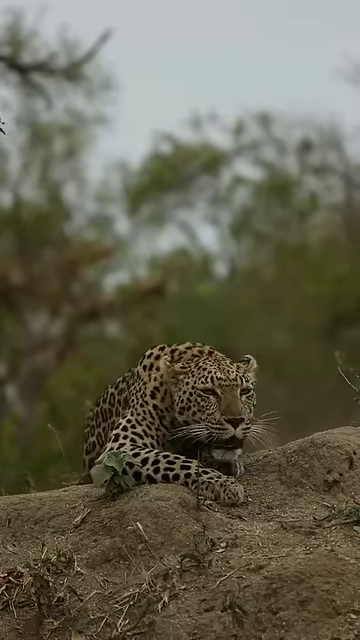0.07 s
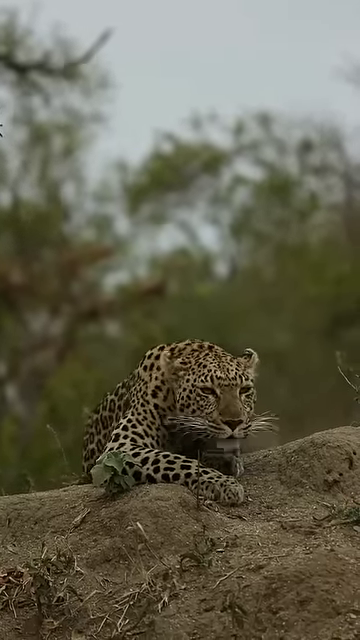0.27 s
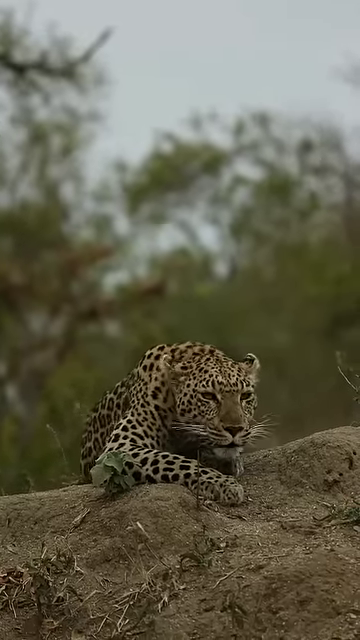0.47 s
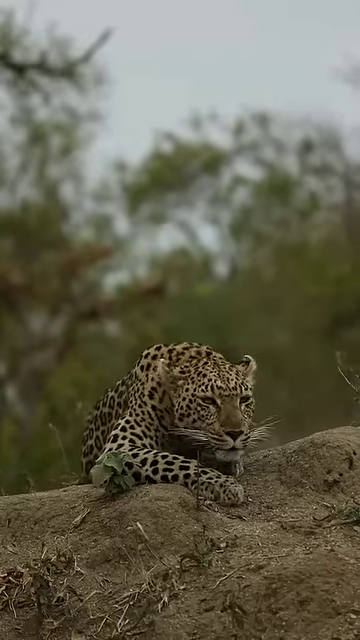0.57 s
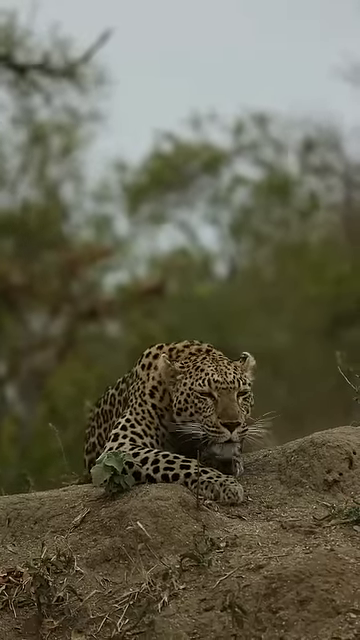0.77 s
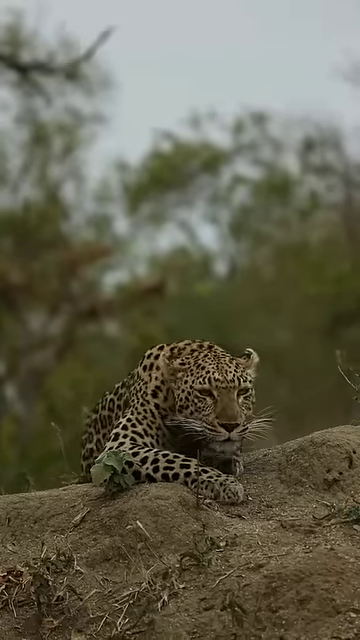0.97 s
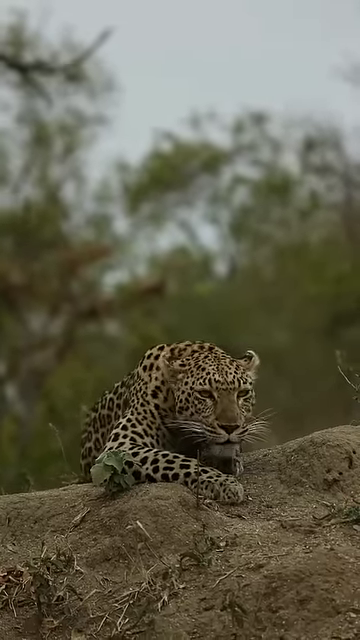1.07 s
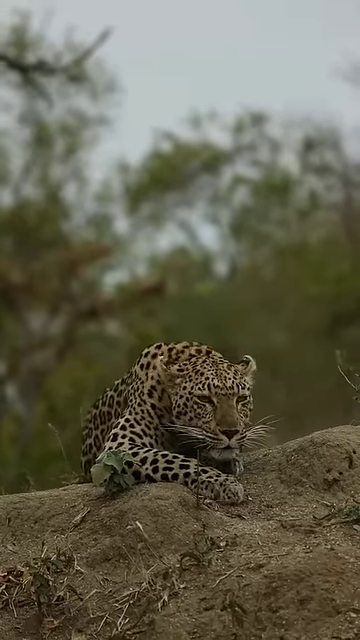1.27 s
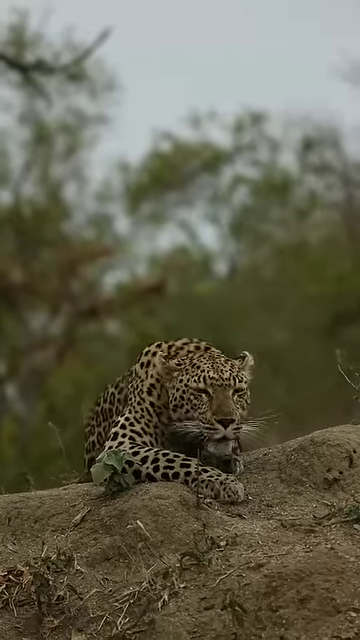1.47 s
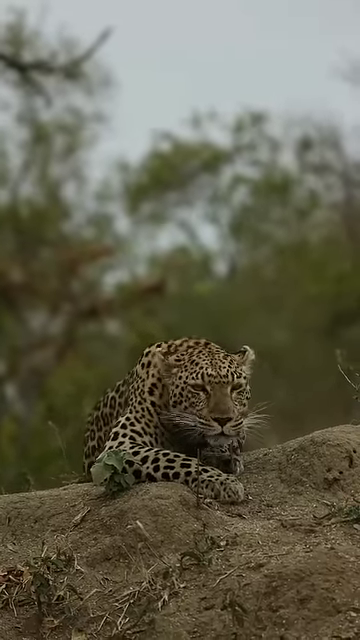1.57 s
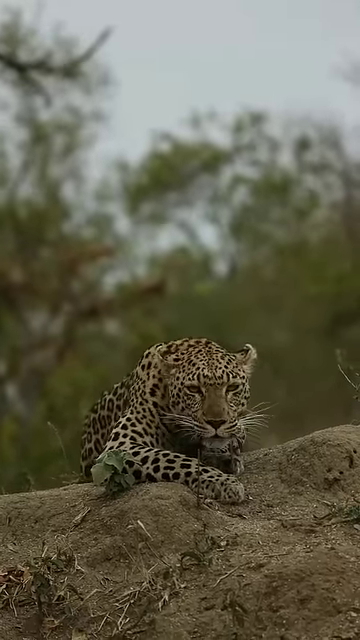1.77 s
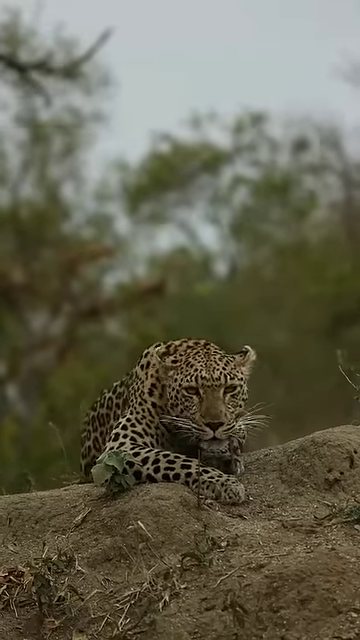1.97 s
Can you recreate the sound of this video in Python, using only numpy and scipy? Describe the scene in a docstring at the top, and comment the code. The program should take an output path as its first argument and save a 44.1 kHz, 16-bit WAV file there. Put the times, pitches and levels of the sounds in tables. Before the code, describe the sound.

A leopard's rasping, sawing call: three deep throaty bursts outdoors, with faint clicks between

```python
"""The bush murmurs faintly throughout as spectrally shaped noise. A leopard saws three times in the open: first
a soft in-stroke grunt, then an out-stroke whose slack vocal folds slap about 50 times a second. Those impulses
ring a deep throat resonance and the higher mouth resonances, under a rasp of air puffs. During the first
out-stroke two dry ticks sound nearby: bursts of decaying noise with a brief sine ring. Late in the second
a camera shutter begins a short burst of three frames, each the same pattern of decaying noise knocks."""
import sys
import numpy as np
from scipy import signal
from scipy.fft import rfft, irfft, next_fast_len
from scipy.io import wavfile
from scipy.ndimage import uniform_filter1d, minimum_filter1d, map_coordinates

SR = 44100
rng = np.random.default_rng(int(sys.argv[2]) if len(sys.argv) > 2 else 0)


def transcribe(u):
    """Save the signal u as a 16-bit wav file named by the first command-line argument.

    u: samples, shape (n,) or (channels, n), limited to [-1, 1]; the rate is SR.
    q: integer samples, one column per channel.
    """
    v = np.clip(np.atleast_2d(u).T, -1, 1)
    q = np.round(v * 32767).astype(np.int16)
    wavfile.write(sys.argv[1], SR, q)


N = 88200
TIME_S = np.arange(N) / SR

# relative spectral weighting of the throat: f/Hz, level/dB
THROAT_SPECTRUM = [(30, -33), (70, 3.5), (130, -2), (220, -1.5), (310, 1), (450, -3), (900, -15.5),
                   (3000, -59)]
# left-right correlation of the breath noise: f/Hz, correlation/1
BREATH_CORRELATION = [(300, .95), (700, 1), (1400, 0.31), (3100, 0.086), (6800, 0.24), (15000, .6)]


def amp(db):
    """Amplitude ratio of a level: twenty decibels are a factor of ten."""
    return 10 ** (np.asarray(db) / 20)


def unit(x):
    """Normalisation to a root-mean-square value of 1."""
    return x / np.sqrt(np.mean(x ** 2) + 1e-20)


def along(points, hz):
    """Linear interpolation of (f/Hz, value) points over logarithmic frequency."""
    f, value = np.transpose(points)
    return np.interp(np.log(hz + 1), np.log(f + 1), value)


def filtered(x, response):
    """Linear filtering: the spectrum is multiplied by a frequency response."""
    size = next_fast_len(N + SR // 2)
    hz = np.fft.rfftfreq(size, 1 / SR)
    return irfft(rfft(x, size) * response(hz), size)[..., :N]


def shaped(x, spectrum):
    """Zero-phase spectral weighting by (f/Hz, level/dB) points."""
    return filtered(x, lambda hz: amp(along(spectrum, hz)))


def noise(spectrum, correlation):
    """Stereo noise of rms 1: the balance of independent mid and side sets the left-right correlation."""
    def mid_and_side(hz):
        angle = np.arccos(np.clip(along(correlation, hz), -1, 1)) / 2
        return amp(along(spectrum, hz)) * np.array([np.cos(angle), np.sin(angle)])

    mid, side = filtered(rng.standard_normal((2, N)), mid_and_side)
    return unit(np.array([mid + side, mid - side]))


def fade(start, t60):
    """Exponential decay after a sudden onset: the level falls 60 dB in t60 seconds."""
    t = TIME_S - start
    return (t >= 0) * amp(-60 * np.abs(t) / t60)


def wobble(rate):
    """Random modulation: a smooth curve through normal deviates at `rate` knots a second."""
    return map_coordinates(rng.standard_normal(2000), [TIME_S * rate], mode="wrap")


def slaps(anchor, rate, jitter, count=40):
    """Quasi-periodic excitation: vocal-fold impulses lose their beat as pressure fades late in the stroke."""
    loose_after_s, loose_growth_per_s = .11, 40
    scatter_db = 3.12  # standard deviation of the slap levels
    chance = rng.standard_normal((count, 2))
    beat = (np.arange(count) - count // 2) / rate
    loose = 1 + loose_growth_per_s * np.maximum(beat - loose_after_s, 0)
    at = np.round((anchor + beat + jitter * loose * chance[:, 0]) * SR).astype(int)
    inside = (at >= 0) & (at < N)
    return np.bincount(at[inside], amp(scatter_db * chance[inside, 1]), N)


def ring(drive, hz, t60, attack, part=np.imag):
    """Damped resonance, which may glide: the drive is shifted to 0 Hz, smeared by the envelope and shifted back."""
    t = np.arange(SR // 5) / SR
    envelope = amp(-60 * t / t60) * (1 - np.exp(-t / attack))
    phasor = np.exp(2j * np.pi * np.cumsum(hz * np.ones(N)) / SR)
    return part(phasor * signal.fftconvolve(drive / phasor, envelope)[:N])


def bush():
    """Diffuse ambience: stationary noise with partly correlated channels."""
    # relative noise spectrum: f/Hz, level/dB
    murmur = [(20, -24), (50, -1), (150, 1.5), (300, -4), (600, -2.5), (1200, -16.5), (2400, -18.5),
              (6000, -26), (15500, -33.5)]
    # left-right correlation: f/Hz, correlation/1
    murmur_correlation = [(60, 0.9), (240, 0.74), (950, 0.81), (3770, -0.3), (15000, 0.02)]
    return amp(-44.5) * noise(murmur, murmur_correlation)


def grunts():
    """Source and filter on the in-stroke: drawn-in air flaps the folds softly against a well damped throat."""
    # in-strokes: centre t/s, slap rate/(1/s), half length/s, grunt level/dB, air level/dB
    in_strokes = [(0.034, 76, 0.041, -27, -39.5), (.679, 58, 0.035, -24.5, -47.5),
                  (1.37, 62, 0.051, -30, -50.5)]
    # relative spectrum of the drawn-in air: f/Hz, level/dB
    intake = [(100, -8.5), (700, -4), (1200, -6.5), (1800, -7), (2300, -18), (2800, -10.5), (4000, -32),
              (6000, -25.5), (15000, -41)]
    throat_hz, throat_t60_s, throat_attack_s = 168.2, 0.027, 0.0079
    sag_per_s = 2  # relative fall of pitch
    edge_db = 10  # drop of the swell one half length from its centre
    out = np.zeros((2, N))
    air = noise(intake, BREATH_CORRELATION)
    for centre, rate, half, grunt_db, air_db in in_strokes:
        t = TIME_S - centre
        swell = amp(-edge_db * (t / half) ** 2)
        hz = throat_hz * (1 - sag_per_s * np.clip(t, -half, half))
        train = slaps(centre, rate, jitter=0.0013)
        flaps = -shaped(ring(train, hz, throat_t60_s, throat_attack_s), THROAT_SPECTRUM)
        flaps = flaps / np.std(flaps[np.abs(t) < half])
        out += swell * (amp(grunt_db) * flaps + amp(air_db) * air)
    return out


def mouth_response(f):
    """Superposed band-pass resonances of alternating sign: the fixed upper modes of the open mouth."""
    # upper mouth resonances: centre f/Hz, bandwidth/Hz, level/dB
    modes = [(796, 82, 4), (1149, 14.6, 4.5), (1533, 10, -7), (1836, 30, -9), (2535, 77, -16.5),
             (2814, 110, -8), (3268, 100, -14.5), (4810, 48, -28), (5390, 160, -20.5), (6120, 310, -23.5),
             (7850, 77, -27)]
    total = 0
    for k, (centre, width, db) in enumerate(modes):
        resonance = 1j * f * width / (centre ** 2 - f ** 2 + 1j * f * width)
        total = total + (-1) ** k * amp(db) * resonance
    return total


def saws():
    """Source and filter on the out-stroke: slaps ring throat and mouth, puffs modulate turbulent air."""
    # out-strokes: first hard slap t/s, slap rate/(1/s), time stretch/1, throat pitch factor/1,
    # then added throat level/dB, mouth level/dB, rasp level/dB
    out_strokes = [(.205, 51.2, 1.022, 1.019, 1, 0.5, 1), (0.8633, 49.8, 0.96, 1.0, 2.5, 2.5, 0.5),
                   (1.569, 48, 0.96, 0.979, 2.5, -1.5, -.5)]
    # common course, before each stroke's stretch, pitch factor and added levels: t/s from the first hard slap,
    # throat f/Hz, throat level/dB, mouth level/dB, rasp level/dB, share of steady tone/1
    course = [(-.065, 150, -93.5, -70, -72.5, 0.9), (-.03, 168, -26.5, -57, -57, 0.4),
              (0, 166.7, -17.5, -29.5, -39, 0), (0.023, 201, -10, -16, -35.5, 0.01),
              (.08, 228, -13.5, -23.5, -36, 0.06), (0.132, 177.3, -10, -22, -35.5, 0.45),
              (.175, 157, -20.5, -42, -47, 0), (.225, 157, -29, -52.5, -50.5, 0),
              (0.278, 154, -55.5, -65.5, -72, 0.15)]
    # relative spectrum of the rasp: f/Hz, level/dB
    rasp_spectrum = [(200, -22), (450, 6), (900, 9), (1400, -4.5), (2200, 5), (2800, 2), (3400, 0),
                     (4100, -9.5), (4800, -6.5), (5900, -3), (7000, -13.5), (8200, -6.5), (10200, -24.5),
                     (13000, -17), (15500, -28)]
    throat_t60_s, throat_attack_s = 0.071, 0.0024
    tone_t60_s, tone_softness = 0.036, 0.25  # memory of the steady tone, softness of its saturation
    jaw_hz, jaw_t60_s, jaw_attack_s = 697.2, 0.025, 0.0018  # lowest mouth resonance
    jaw_throat_hz, jaw_follow = 198.4, 0.31  # throat pitch at jaw_hz, exponent by which the jaw follows it
    jaw_air_db, upper_air_db = 1, 3.5  # turbulence against the slaps
    upper_db = 3.5  # upper resonances against the rasp noise
    puff_s, leak = 0.0028, 0.99  # rise time of a puff, flow between puffs
    jitter_s, puff_scatter_db = 0.00076, 3.5  # standard deviations; the jitter grows late in the stroke
    flutter_per_s, flutter_db = 130, 1.5  # random unevenness of the rasp

    puff = TIME_S / puff_s * np.exp(1 - TIME_S / puff_s)
    when, *shape = np.transpose(course)
    out = np.zeros((2, N))
    for start, rate, stretch, pitch, throat_db, mouth_db, rasp_db in out_strokes:
        t = (TIME_S - start) / stretch
        hz, low_db, mid_db, high_db, steady = [np.interp(t, when, column) for column in shape]
        hz = hz * pitch
        active = (t > when[0]) & (t < when[-1])

        def level(x):  # rms 1 within the stroke, silence outside
            return active * x / np.sqrt(np.mean(x[..., active] ** 2))

        train = slaps(start, rate, jitter_s)
        throat = shaped(ring(train, hz, throat_t60_s, throat_attack_s), THROAT_SPECTRUM)
        # a second resonance and a saturated envelope make the tone steadier
        tone = level(ring(throat, hz, tone_t60_s, throat_attack_s, part=np.real))
        tone = level(tone / (np.abs(signal.hilbert(tone)) + tone_softness))
        throat = level(throat)
        throat = level(throat + np.clip(steady, 0, 1) * (tone - throat))

        uneven = train * amp(puff_scatter_db * rng.standard_normal(N))
        puffs = leak + signal.fftconvolve(uneven, puff)[:N]

        def flow(air_db):  # slaps plus puffed turbulence
            return level(train) + amp(air_db) * level(puffs * rng.standard_normal(N))

        jaw_glide_hz = jaw_hz * (hz / jaw_throat_hz) ** jaw_follow
        mouth = ring(flow(jaw_air_db), jaw_glide_hz, jaw_t60_s, jaw_attack_s)
        upper = filtered(flow(upper_air_db), mouth_response)
        rasp = level(puffs * noise(rasp_spectrum, BREATH_CORRELATION)) + amp(upper_db) * level(upper)
        out += amp(low_db + throat_db) * level(throat)
        out += amp(mid_db + mouth_db) * level(mouth)
        out += amp(high_db + rasp_db + flutter_db * wobble(flutter_per_s)) * rasp
    return out


def ticks():
    """Impulsive excitation: a short dry noise crack and a sine ring share one exponential decay."""
    # ticks: t/s, level/dB, t60/s, left minus right level/dB, ring f/Hz
    snaps = [(0.3759, -24, 0.018, -2.5, 2834), (0.449, -31, 0.0067, -4.5, 4300)]
    # relative spectrum of the crack: f/Hz, level/dB
    crack_spectrum = [(300, -25), (1200, -6.5), (2000, 3), (3500, -0.5), (5500, -12), (9000, -14.5),
                      (15000, -19)]
    ring_db = 0.5  # sine amplitude against the rms of the undecayed crack noise
    crack = noise(crack_spectrum, [(1000, 0.0098)])  # nearly uncorrelated channels
    out = np.zeros((2, N))
    for start, db, t60, pan_db, hz in snaps:
        sides = amp([[db + pan_db / 2], [db - pan_db / 2]])
        sine = np.sin(2 * np.pi * hz * TIME_S)
        out += sides * fade(start, t60) * (crack + amp(ring_db) * sine)
    return out


def shutter():
    """Summation of power: mirror and blades knock in the same pattern of decays for every frame."""
    # frames: t/s, level/dB
    frames = [(1.112, 3.5), (1.194, 3.5), (1.277, 7)]
    # knocks within a frame: t/s after its start, level/dB before the frame's is added, t60/s
    knocks = [(0.001, -43, 0.064), (.009, -36.5, .04), (0.03, -47, 0.3), (.052, -40.5, .045)]
    # relative spectrum of the knocks: f/Hz, level/dB
    knock_spectrum = [(200, -24.5), (600, -4.5), (1030, 8.5), (1330, -2), (1700, 1.5), (2200, -5.5),
                      (2900, -19.5), (5000, -15.5), (8000, -25.5), (15000, -29)]
    # left-right correlation: f/Hz, correlation/1
    knock_correlation = [(1400, 1), (3100, 0)]
    power = np.zeros(N)
    for start, frame_db in frames:
        for lag, knock_db, t60 in knocks:
            power += (amp(frame_db + knock_db) * fade(start + lag, t60)) ** 2
    return np.sqrt(power) * noise(knock_spectrum, knock_correlation)


def outdoors(x):
    """Convolution with decaying noise: quick scatter off the ground and a faint tail from the trees."""
    # decay of the tail: f/Hz, t60/s
    tail_t60 = [(150, 0.15), (700, 0.17), (3000, 0.49), (12000, 0.32)]
    # ground scatter against the direct sound: f/Hz, level/dB
    ground_spectrum = [(200, -15), (700, -23.5), (1500, -8.5), (3000, -2.5), (12000, -11)]
    tail_db, ground_t60_s = -18.5, 0.031
    hz, t, cells = signal.stft(rng.standard_normal((2, SR // 2)), SR, nperseg=256)
    decay = amp(-60 * t / along(tail_t60, hz)[:, None])
    tail = signal.istft(cells * decay, SR, nperseg=256)[1]
    ground = rng.standard_normal(tail.shape) * fade(0, ground_t60_s)[:tail.shape[1]]

    def answer(impulse):
        return signal.fftconvolve(x, impulse / np.linalg.norm(impulse[0]), axes=1)[:, :N]

    return x + amp(tail_db) * answer(tail) + shaped(answer(ground), ground_spectrum)


def scene():
    """Superposition: level differences lean the cat to the right, and the bush is added without reflections."""
    # stereo balance of the cat: f/Hz, left minus right level/dB
    balance = [(100, -0.6), (700, -2.5), (1290, -5), (2380, -6), (4400, -6), (8120, -2), (15000, 0)]
    halves = np.array([[.5], [-.5]])
    cat = filtered(grunts() + saws(), lambda hz: amp(along(balance, hz) * halves))
    return bush() + outdoors(cat + ticks() + shutter())


def record(dry):
    """Peak limiting and band limiting: a quick smoothed gain holds down the peaks, and the top is cut."""
    ceiling, window_s, top_hz = .85, .008, 15750
    size = int(window_s * SR)
    needed = ceiling / np.maximum(np.abs(dry).max(axis=0), ceiling)
    gain = uniform_filter1d(minimum_filter1d(needed, size), size)
    return filtered(dry * gain, lambda hz: hz < top_hz)


dry = scene()
out = record(dry)
transcribe(out)
```